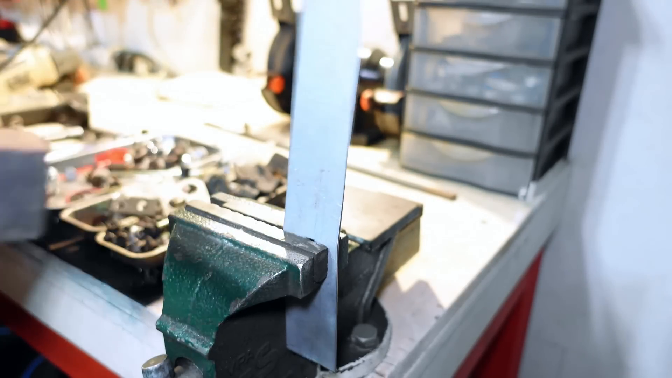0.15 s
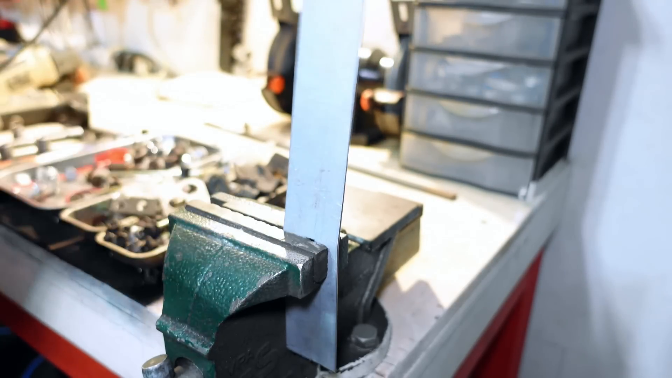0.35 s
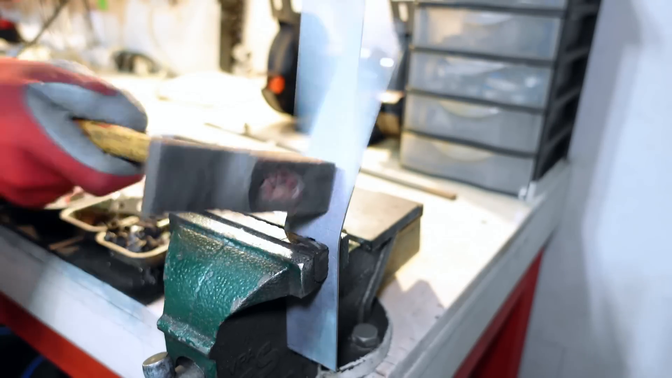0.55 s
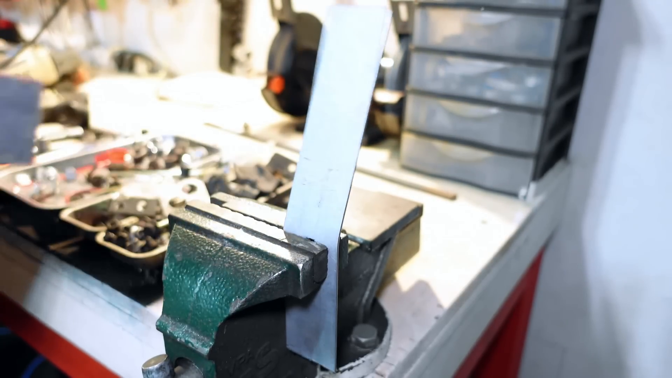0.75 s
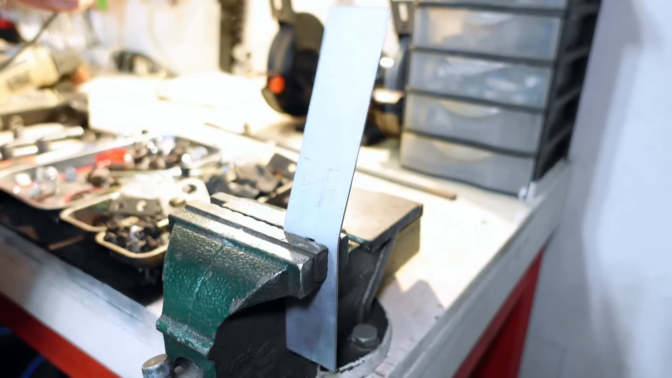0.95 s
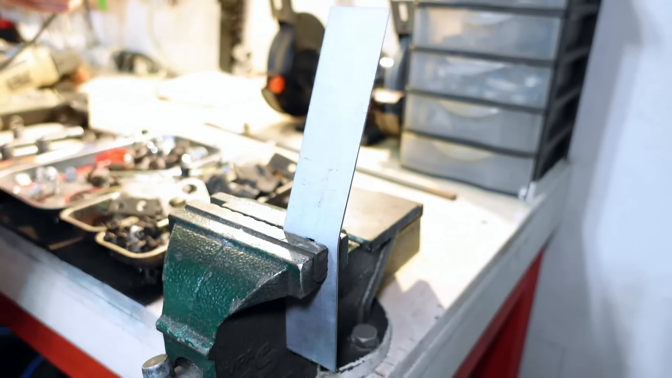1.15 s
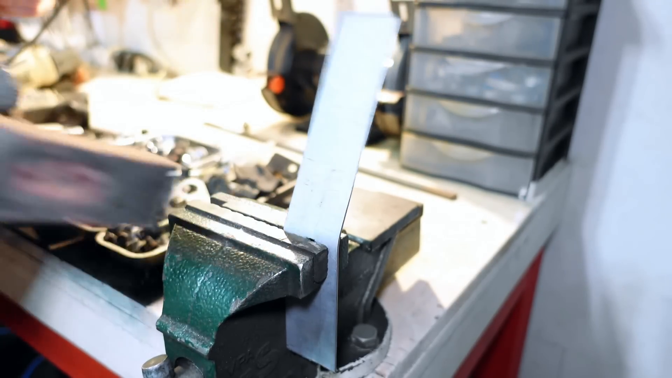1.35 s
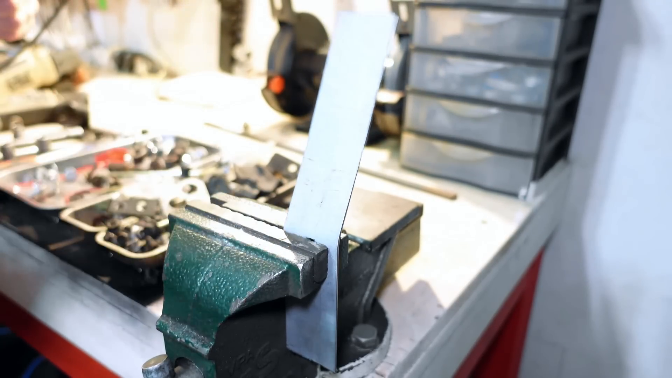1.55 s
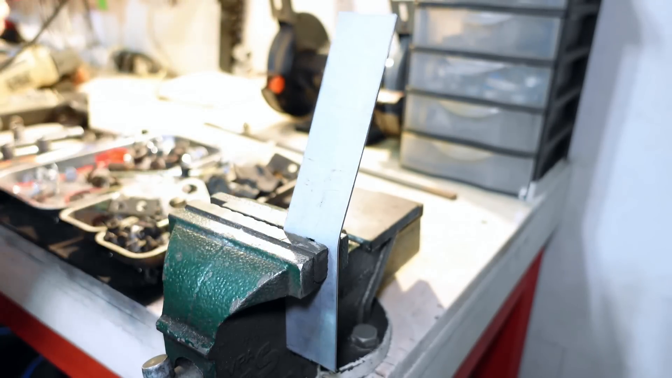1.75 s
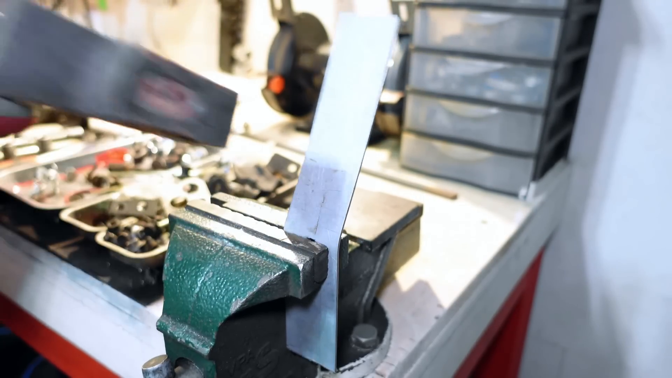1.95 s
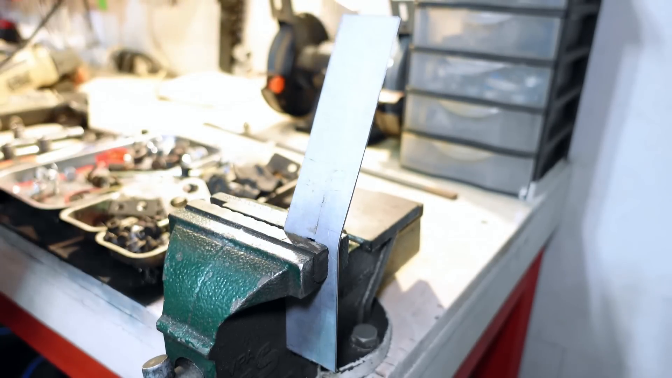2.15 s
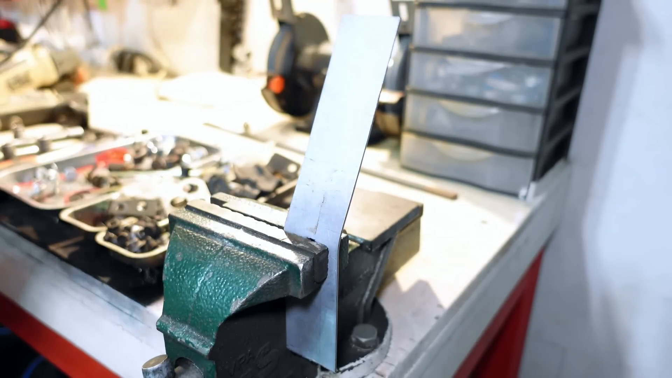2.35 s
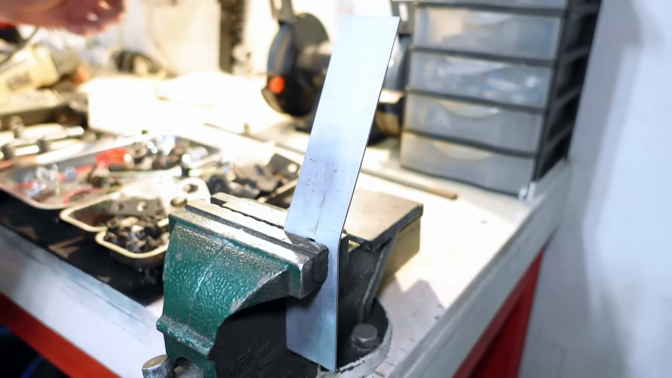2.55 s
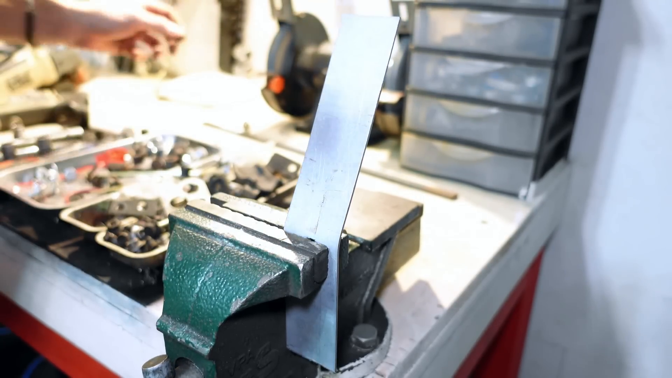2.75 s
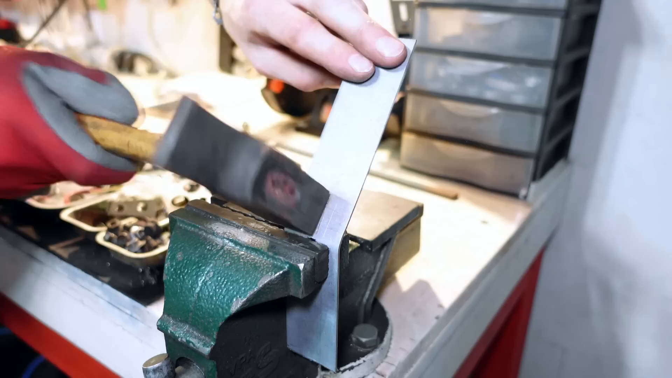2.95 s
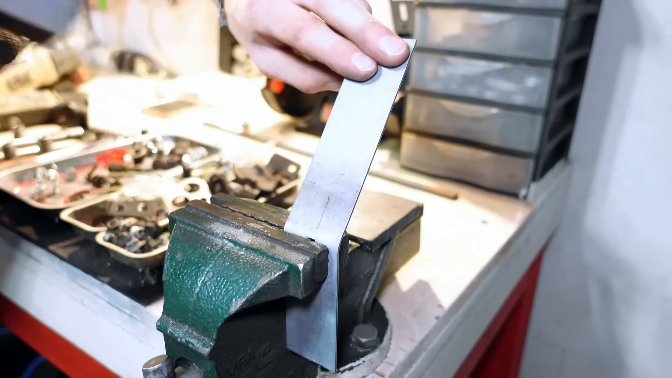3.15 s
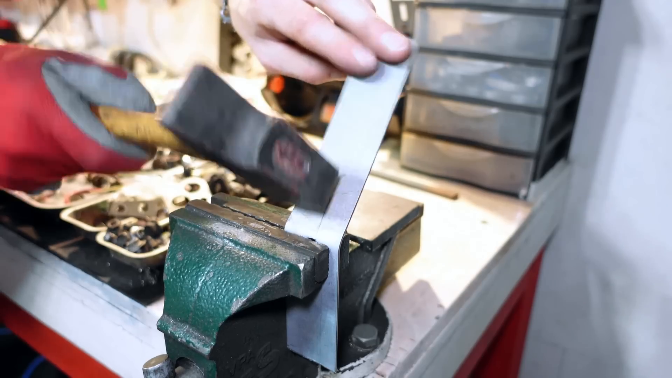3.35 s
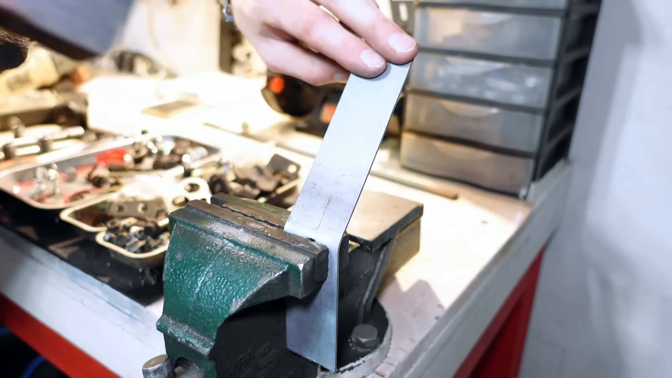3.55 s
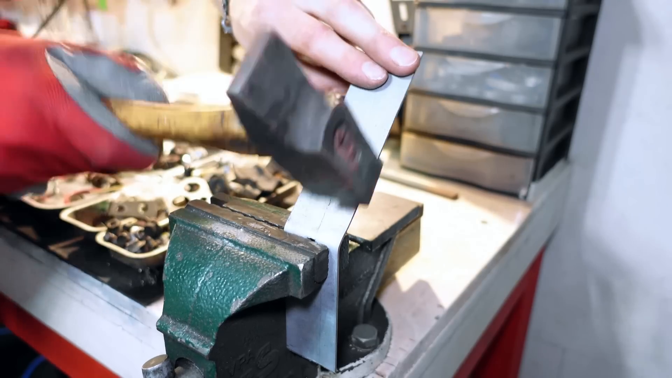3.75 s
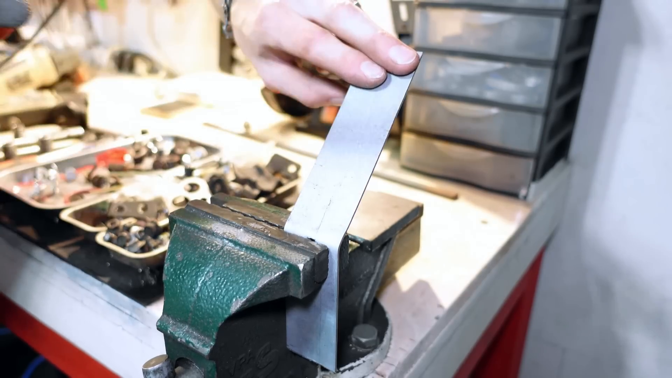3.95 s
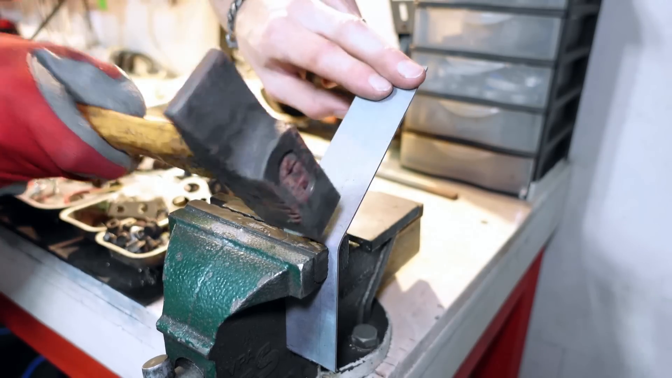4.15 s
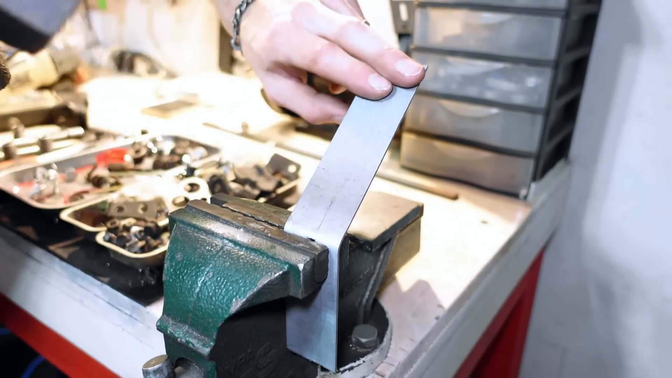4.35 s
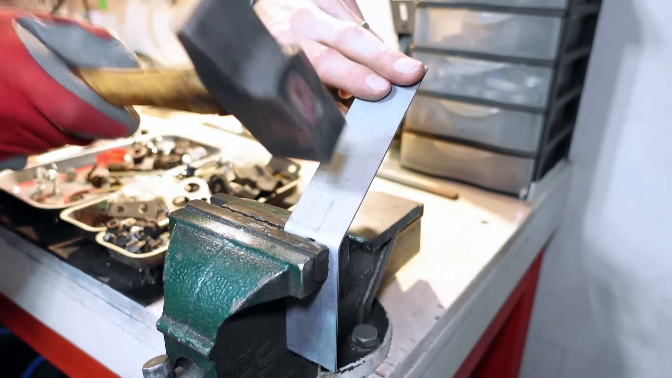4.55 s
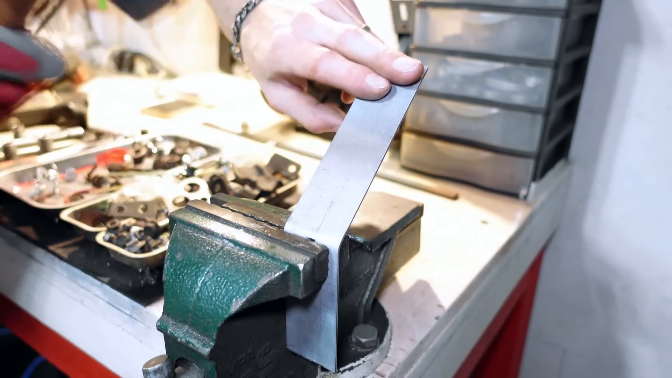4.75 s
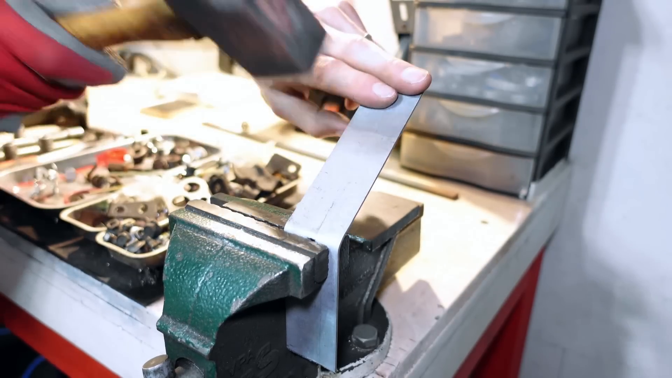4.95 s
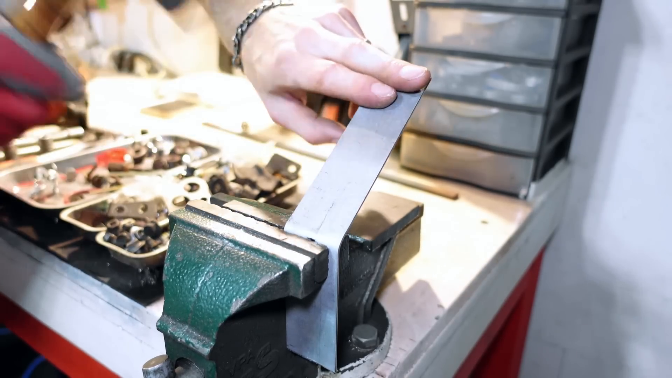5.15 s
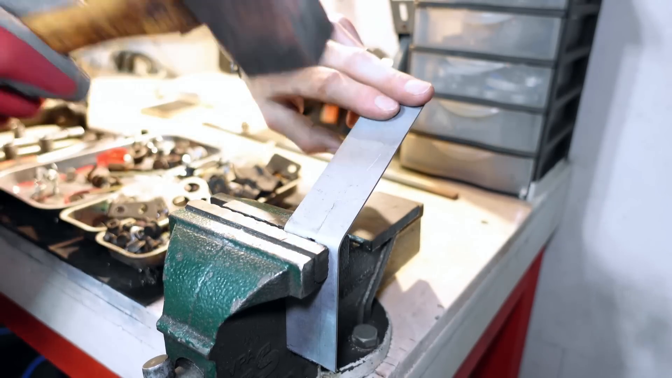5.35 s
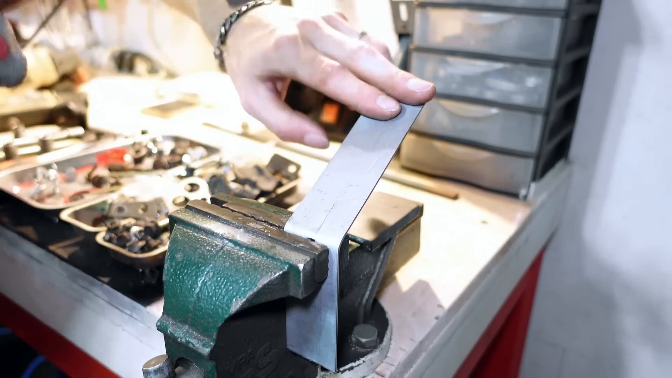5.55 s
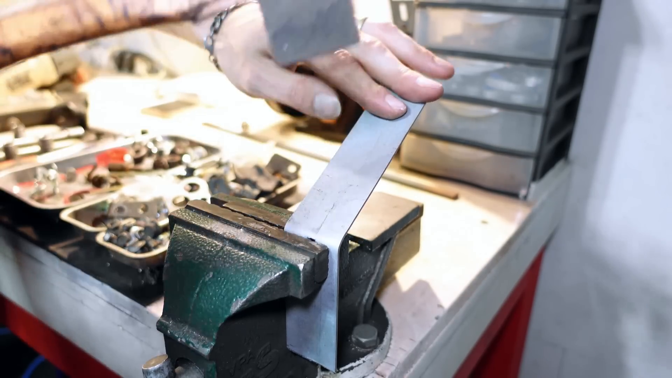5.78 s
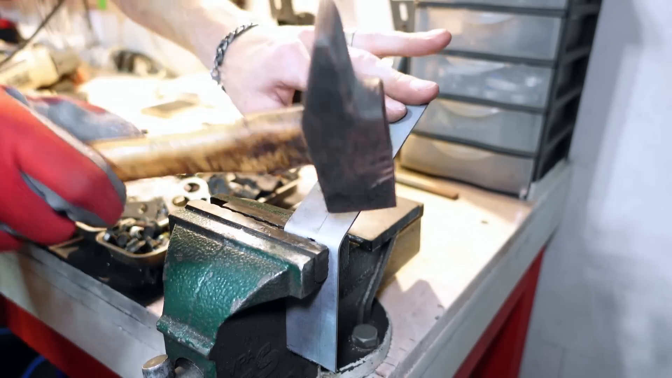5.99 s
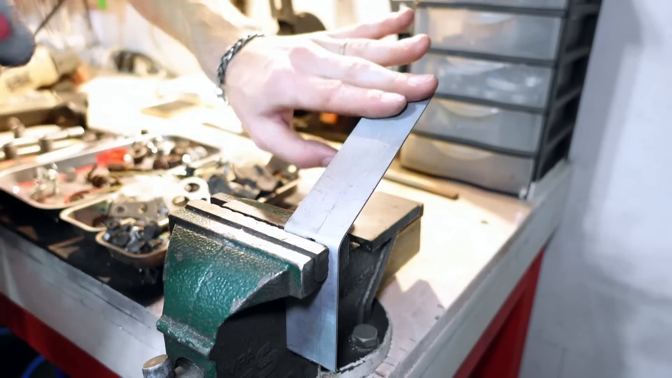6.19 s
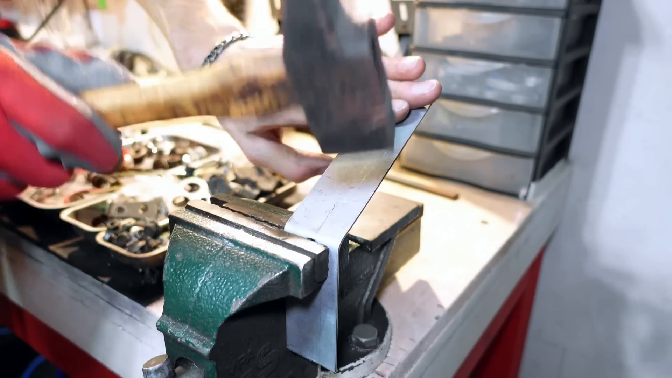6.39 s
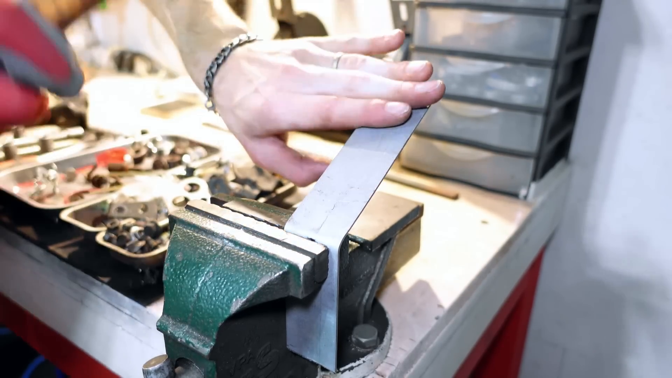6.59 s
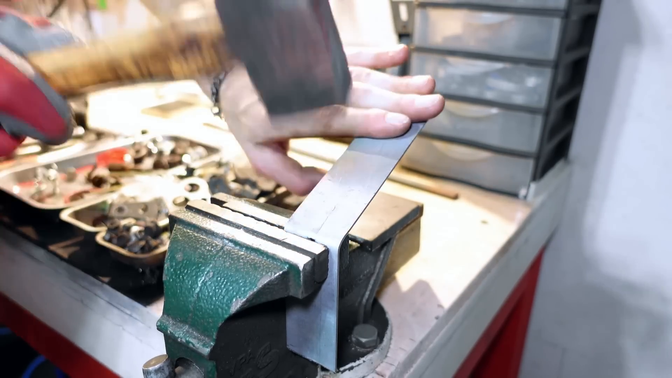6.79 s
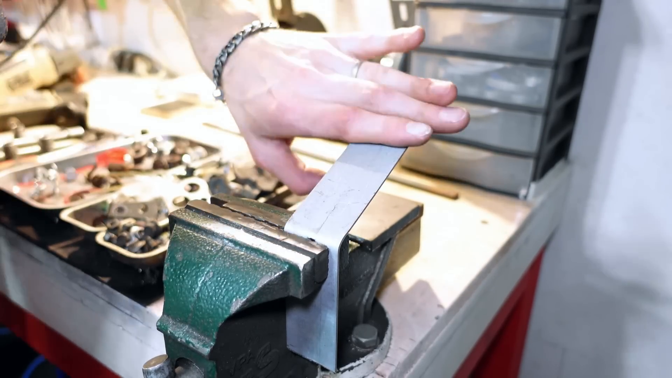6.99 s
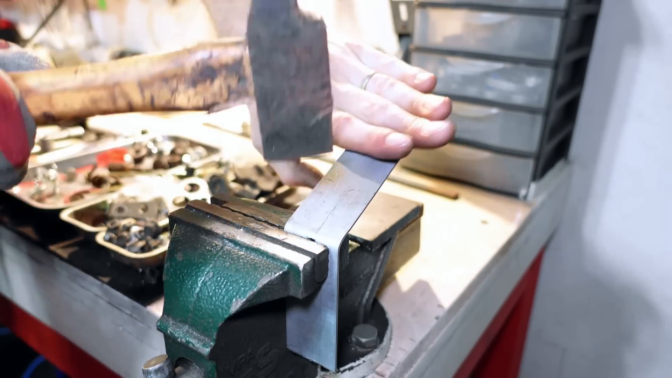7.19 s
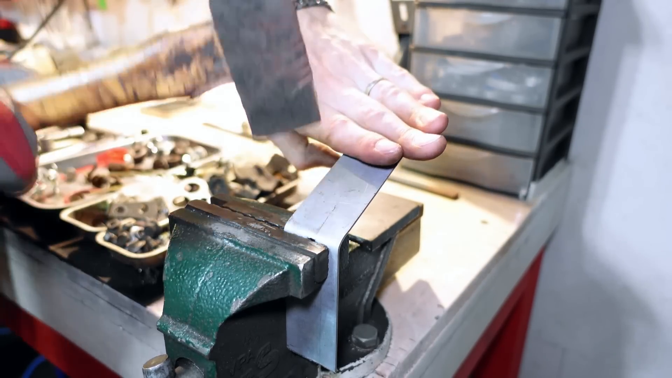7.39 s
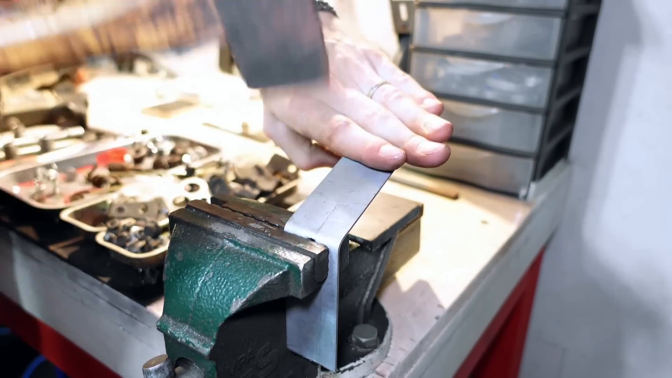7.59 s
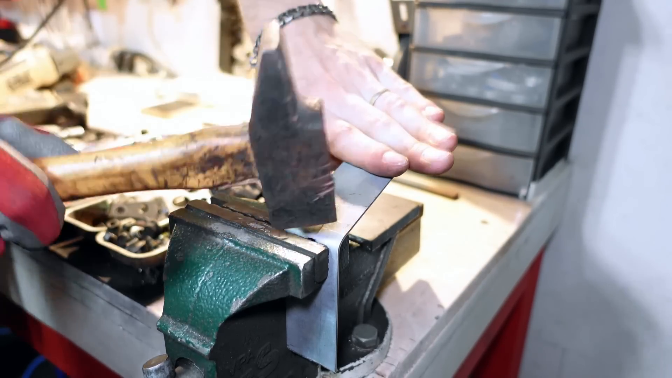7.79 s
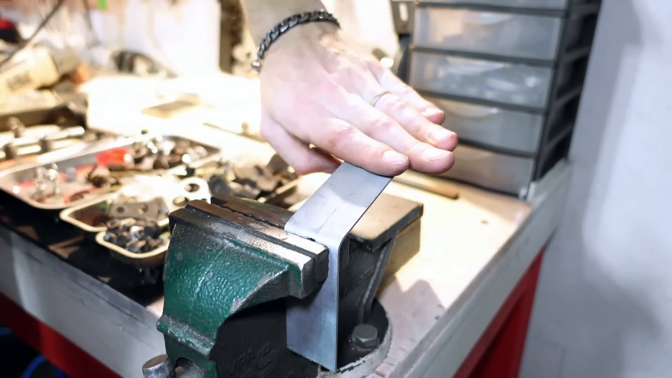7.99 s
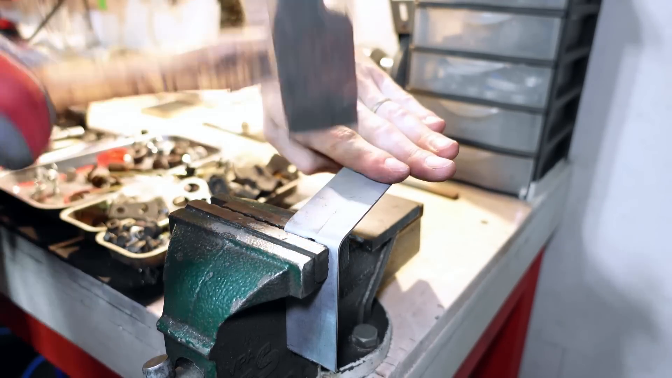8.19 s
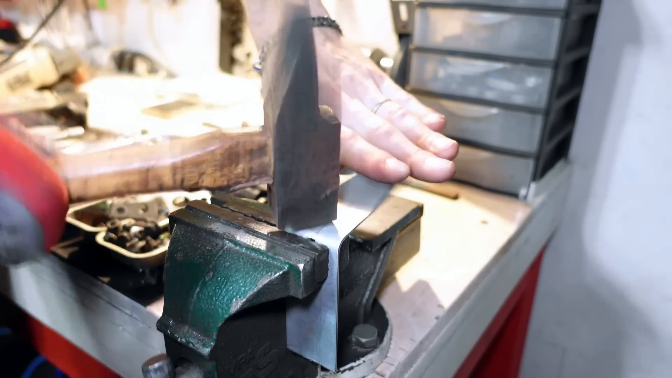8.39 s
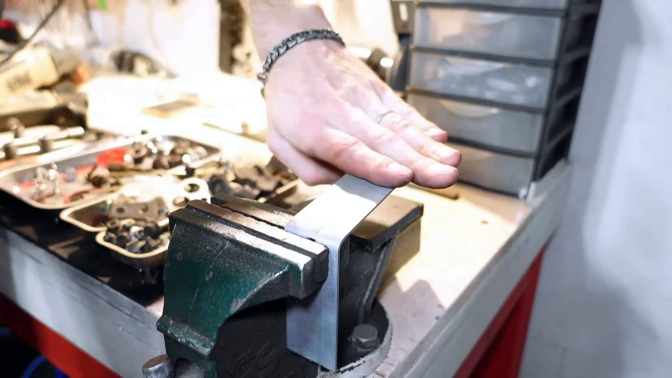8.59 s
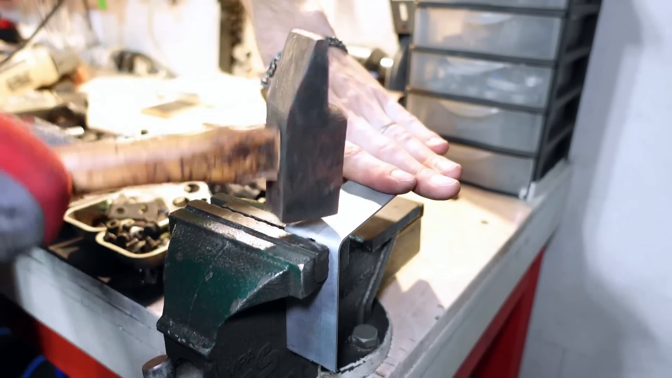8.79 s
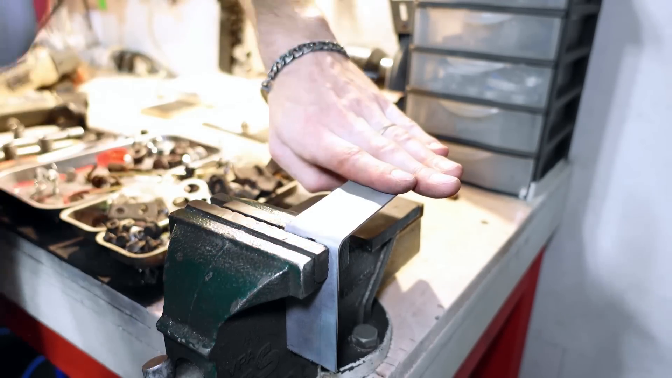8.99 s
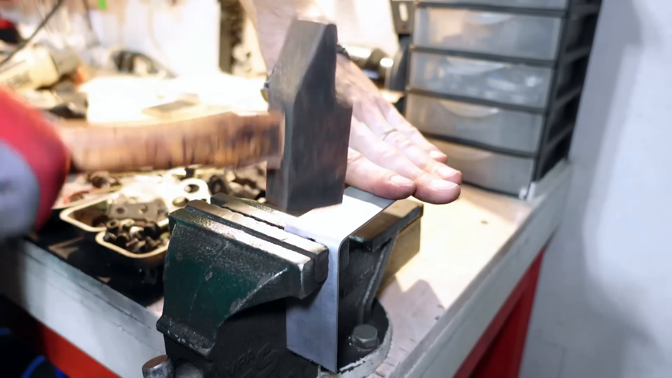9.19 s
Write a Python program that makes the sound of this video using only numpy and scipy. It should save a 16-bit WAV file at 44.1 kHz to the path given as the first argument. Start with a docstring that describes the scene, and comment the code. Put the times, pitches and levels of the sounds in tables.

```python
"""Hammering a steel bar in a vise

A hammer bends a flat bar clamped to a workshop bench. Each impact cracks, then swells into a clang of
bar, vise and loose tools over the boom of bench and room. The bar vibrates freely and buzzes in the
jaws until a hand holds it. The fourth blow shakes loose a steel part, which tumbles away."""
import numpy as np
from scipy import signal
from scipy.fft import rfft, irfft, next_fast_len
import sys
import numpy as np
from scipy import signal
from scipy.fft import rfft, irfft, next_fast_len
from scipy.io import wavfile

SR = 44100
rng = np.random.default_rng(int(sys.argv[2]) if len(sys.argv) > 2 else 0)


def dump_mix(stems):
    """Bounce the given channels to the path in sys.argv[1] as a 16-bit WAV at rate SR."""
    frames = np.atleast_2d(stems).T  # one column per channel
    limited = np.clip(frames, -1, 1)  # hard clip at full scale
    pcm = np.round(limited * 32767).astype(np.int16)
    wavfile.write(sys.argv[1], SR, pcm)


N = 407043
T = np.arange(int(1.12 * SR)) / SR  # seconds since a contact
HOLD_S = .087  # time before the clang starts to decay

# Hammer blows. Each row: start in seconds, crack, boom, clank and treble levels in dB,
# knock pitch in Hz, knock level in dB, zing pitch in Hz, zing level in dB.
BLOWS = [(0.0777, -16.5, 0, -1.5, 4, 485, -22, 7590, -25),
         (0.641, -11.5, -4, -5.5, 3, 980, -29, 4270, -22.5),
         (1.3448, -18, 1.5, 1.5, 4.5, 905, -27, 4560, -32),
         (1.9387, -.5, -4.5, 5, 2.5, 900, -24, 9100, -31),
         (3.0465, -10, 1, 6.5, -3.5, 1110, -25, 7320, -34.5),
         (3.4334, -12, 2.5, 3.5, -2, 1042, -24, 4500, -37), (3.8177, -10, 4, 0.5, -.5, 490, -25, 4440, -34),
         (4.1966, -11.5, .5, -.5, -.5, 1091, -28, 8100, -30),
         (4.568, -6.5, .5, 5, 0.5, 815, -26, 7400, -31.5), (4.92, -7, 2, -2, 0.5, 490, -28, 6600, -36),
         (5.299, -8, .5, -4, 1, 490, -28, 3660, -17.5), (6.051, -14.5, -6, -7, -3, 1010, -28, 4380, -22),
         (6.4031, -7.5, 1.5, -4.5, .5, 830, -33, 8480, -29), (6.7457, -8.5, -1, -7, 1, 480, -32, 4070, -17),
         (7.539, -13.5, -1.5, -5, -1, 840, -30, 9520, -35),
         (7.8646, -6, -.5, -2.5, 2, 850, -29, 11930, -36), (8.1776, -5, 0, -1, 1, 490, -30, 5660, -26.5),
         (8.4869, -7, -1, -2.5, 1.5, 490, -30, 8480, -28), (8.8086, -5, 1.5, 5, 2.5, 1020, -27, 1650, -32),
         (9.133, -6, -2.5, 4.5, 1, 660, -24, 5420, -29)]
# Decay of a clang in the workshop. Each row: frequency in Hz, time to fall 60 dB in seconds.
DECAY_TIMES = [(35, 0.41), (95, 0.98), (180, 0.77), (500, 0.59), (1500, 0.45), (4000, 0.49), (9000, 0.42),
               (15000, 0.24)]
# Likeness of the two channels. Each row: frequency in Hz, coherence from 0 to 1.
COHERENCE = [(150, 1), (600, 0.97), (2000, 0.94), (5000, .83), (14000, .87)]


def hammer():
    """Impact excitation: each blow cracks, then drives dense modes weighted by where it lands."""
    # Spectra of the clang and of the first crack. Each row: frequency in Hz, level in dB.
    clang_spectrum = [(25, -45), (55, -24.5), (110, -10), (170, -3), (280, -3.5), (450, -5), (700, -5.5),
                      (1000, -11.5), (1500, -14), (2600, -17.5), (4600, -12), (7000, -18.5), (10000, -19.5),
                      (15500, -27.5)]
    crack_spectrum = [(100, -32), (700, -10), (2000, -9), (4800, 2.5), (8000, -4.5), (15500, -5.5)]
    # Resonances of a jolted vise. Each row: centre in Hz, half-width in Hz, gain in dB per dB of jolt.
    jolt_resonances = [(680, 150, 1.9), (1420, 150, 2.2)]
    out = np.zeros((2, N))
    grid = np.fft.rfftfreq(len(T), 1 / SR)
    room_db = 3 * ripple(grid, spacing=11) / (1 + (grid / 1800) ** 2)  # same room modes for every blow
    for start, crack_db, boom_db, clank_db, treble_db, *_ in BLOWS:
        crack = noise(lambda hz: along(crack_spectrum, hz) + 3 * ripple(hz, spacing=400))
        crack *= fade(T, t60=.021)
        crack /= np.sqrt(np.mean(crack[:, T < .003] ** 2))  # rms 1 over the first 3 ms
        add(out, start, amp(crack_db) * crack)

        jolt = max(clank_db - 3, 0)  # a strong clank jolts the whole vise and dulls the sizzle
        colour = [(180, boom_db), (650, clank_db), (4600, treble_db), (10500, treble_db - .8 * jolt)]
        jolt_db = jolt * sum(gain * bump(grid, hz, width) for hz, width, gain in jolt_resonances)
        steel_db = 2.6 * ripple(grid, spacing=85) * grid / (grid + 600)  # other modes at each landing
        steel_db += 2.3 * ripple(grid, spacing=550) * grid / (grid + 2500)  # gathered in broad groups
        modes_db = jolt_db + steel_db + room_db
        clang = noise(lambda hz: along(clang_spectrum, hz) + along(colour, hz) + modes_db)
        rattle_s = .008 * max(crack_db + 6.5, 0)  # a hard blow keeps the clang going longer
        clang = die_away(clang, HOLD_S + rattle_s)
        # The clang starts low and rises like a limiter recovering, deeper and slower after a weak crack.
        weakness = max(-9.5 - crack_db, 0)
        recovery = swell(start_db=-6.5 - .72 * weakness, rise=.018 + .0021 * weakness)
        add(out, start, amp(-1) * (clang + vise(colour)) * recovery)
        add(out, start, amp(boom_db - 24.5) * boom(lag=.0264, hold=.11, t60=.52))
    return out


def vise(colour, detune=.006):
    """Damped modes of vise and hammer head, their pitches scattered as grip and contact change."""
    # Each row: frequency in Hz, level in dB, time to fall 60 dB in seconds.
    modes = [(337.8, -34, 0.6), (419, -41, 0.18), (488, -30, 0.55), (572, -39.5, 0.66), (658, -37.5, 0.37),
             (891, -36.5, 0.39), (1077, -37.5, 0.59), (1420, -42, .45), (1860, -43, 0.5), (2776, -39, 0.51),
             (4590, -35.5, 0.59), (5450, -31.5, 0.38), (9500, -42.5, .4), (10400, -39, 0.38)]
    ring = np.zeros((2, len(T)))
    for hz, db, t60 in modes:
        gain = amp(db + along(colour, hz) + rng.normal(0, 2.8))
        pitch = hz * (1 + detune * rng.normal())
        flutter = (.7 + hz / 10000) * ripple(T, spacing=.02)
        ring += gain * tone(pitch, flutter) * fade(T, t60, HOLD_S)
    return ring


def boom(lag, hold, t60):
    """Beating: neighbouring low modes of bench and room, alternating in sign, interfere in a throb."""
    # Each row: frequency in Hz, level in dB.
    modes = [(124, -9), (151, -9.5), (169, 4), (186, 1), (201, 5), (222, -8.5), (245, -9.5)]
    throb = sum((-1) ** k * amp(db + rng.normal(0, 1)) * np.sin(2 * np.pi * hz * (T - lag))
                for k, (hz, db) in enumerate(modes))
    return throb * swell(start_db=-27, rise=.018) * fade(T, t60, hold)


def knocks_and_zings():
    """Selective excitation: strike point and grip pick a low knock, a high zing and a stray cluster."""
    # Inharmonic partials of a bending bar. Each row: multiple of the knock pitch, level in dB.
    knock_partials = [(1, 0), (2.83, -8), (5.4, -12)]
    out = np.zeros((2, N))
    for start, *_, treble_db, knock_hz, knock_db, zing_hz, zing_db in BLOWS:
        for multiple, db in knock_partials:
            add(out, start, amp(knock_db + db) * cluster(multiple * knock_hz))
        add(out, start, amp(zing_db) * cluster(zing_hz))
        stray_hz = rng.uniform(6020, 13000)
        add(out, start, amp(treble_db - 38) * cluster(stray_hz))
    return out


def cluster(centre):
    """Modal overlap: close steel modes beat round one pitch, and blur into noise if widely spread."""
    width = 32 + centre * (.012 + .16 * bump(centre, 3960, 520))  # Hz; the modes crowd near 4 kHz
    offsets = np.linspace(-.8, .8, num=4) + rng.uniform(-.2, .2, size=4)
    partials = unit(sum(bump(offset, 0, .95) * tone(centre + offset * width, .3 * ripple(T, spacing=.012))
                        for offset in offsets))
    haze = unit(noise(lambda hz: -20 * np.log10(1 + ((hz - centre) / width) ** 6)))
    blur = min(width / 450, 1)
    ring = np.sqrt(1 - blur) * partials + np.sqrt(blur) * haze
    t60 = along(DECAY_TIMES, centre) * (1 + 5 / width)  # narrow clusters outlast the clang
    return ring * swell(start_db=-5.5, rise=.02) * fade(T, t60, HOLD_S)


def free_bar(swing_hz=73.8, damping_hz=10000):
    """Free vibration: the unheld bar swings against the jaws, fluttering and chattering once a swing."""
    # Each row: frequency in Hz, level in dB, flutter depth in radians, 0 for bending or 1 for twisting.
    modes = [(77.7, -2, .05, 0), (225.4, -2, 0.63, 0), (287, -7, .2, 0), (443, -9, .3, 0), (842, -2, .3, 1),
             (901, 0, .4, 1), (1063, -2, .5, 1), (1260, -3.5, .9, 0), (1745, -6, .5, 0),
             (2640, -3.5, .6, 0), (2800, -6, 1.1, 1), (4510, -2, 1.1, 1), (6720, -13, .69, 0),
             (7640, -18, .13, 0), (8812, -19, .54, 1)]
    # Spells of ringing, each stopped by the next blow. Each row: start in seconds,
    # time for the buzz to fall 60 dB in seconds, bending, twisting and buzz levels in dB.
    spells = [(0, 2.6, -54, -80, -83), (.078, 2.3, -35, -62, -43), (.641, .8, -23.5, -20.5, -31),
              (1.345, 3.8, -41, -28, -32.5), (1.939, 1.7, -38, -55, -67)]
    # Chatter in the jaws. Each row: frequency in Hz, level in dB.
    buzz_spectrum = [(300, -2), (1500, 2.5), (3300, 0), (5000, -2.5), (6400, 5.5), (8000, -13.5),
                     (10000, -6), (12000, -9), (13200, -6), (15500, -5.5)]
    out = np.zeros((2, N))
    swing = 2 * np.pi * swing_hz * T
    for start, t60, bend_db, twist_db, buzz_db in spells:
        ring = np.zeros((2, len(T)))
        for hz, db, depth, twists in modes:
            gain = amp(db + (twist_db if twists else bend_db) + 3.5 * ripple(T, spacing=.06))
            flutter = depth * (np.sin(swing + rng.uniform(0, 2 * np.pi)) + .7 * ripple(T, spacing=.02))
            ring += gain * tone(hz, flutter) * fade(T, t60 / (1 + hz / damping_hz))
        chatter = noise(lambda hz: along(buzz_spectrum, hz) + 4.5 * ripple(hz, spacing=47))
        buzz = amp(buzz_db) * unit(chatter * amp(5.5 * np.cos(swing))) * fade(T, t60)
        next_blow = min(blow[0] for blow in BLOWS if blow[0] > start + .02)
        stopped = fade(T, t60=.08, hold=next_blow - start)
        add(out, start, (ring + buzz) * stopped * swell(start_db=-20, rise=.07))
    return out


def tumbling_part(lands_s=2.43, ring_db_per_s=27, thud_fall_db_per_s=140):
    """Repeated impacts: a loose steel part bounces and lands with a thud; each clack reverberates."""
    # Each row: start in seconds, level in dB.
    bounces = [(2.132, -8), (2.178, -7.5), (2.19, -6.5), (2.2245, -10), (2.238, -9), (2.294, -12.5),
               (2.308, -10.5), (2.329, -14), (2.344, -7), (2.352, -9), (2.436, -5), (2.474, -15),
               (2.526, -5.5), (2.573, -24)]
    # Each row: centre in Hz, half-width in Hz, gain in dB.
    resonances = [(1620, 300, 7.5), (1990, 25, 1), (2777, 90, 2), (5220, 150, 2)]
    # The broad clack under the resonances. Each row: frequency in Hz, level in dB.
    clack_spectrum = [(60, -25), (250, -1.5), (500, 0), (1300, 2), (3500, 0.5), (7000, -8.5), (15500, -21)]
    out = np.zeros((2, N))
    for start, db in bounces:
        ring_db = -4 + ring_db_per_s * (start - bounces[0][0])  # rings more as it clears the vise
        thud_db = 17.5 - thud_fall_db_per_s * (start - lands_s) if start > lands_s else -3

        def colour(hz):
            peaks_db = sum((gain + ring_db) * bump(hz, mode, width) for mode, width, gain in resonances)
            return along(clack_spectrum, hz) + peaks_db

        clack = unit(noise(lambda hz: colour(hz) + 2 * ripple(hz, spacing=250)))
        room = unit(noise(lambda hz: colour(hz) + thud_db * bump(hz, 570, 570)))
        attack = 1 - np.exp(-T / .0011)
        add(out, start, amp(db) * clack * attack * fade(T, t60=.045))
        add(out, start, amp(db - 15) * die_away(room, hold=.01))
    return out


def handling():
    """Light impacts give faint knocks; friction gives a swish as the hand shifts along the bar."""
    # Each row: start in seconds, level in dB, resonance in Hz.
    taps = [(.043, -45.5, 9000), (1.135, -54, 1190), (5.79, -52.5, 679), (7.503, -61, 7400)]
    out = np.zeros((2, N))
    for start, db, centre in taps:
        tap = unit(noise(lambda hz: 26 * bump(hz, centre, .25 * centre) - 6 * np.log2(1 + hz / centre)))
        add(out, start, amp(db) * tap * (fade(T, t60=.073) + amp(-15) * fade(T, t60=.4)))
    swish = unit(noise(lambda hz: along([(300, -19.5), (4500, 0), (15000, 1)], hz)))
    add(out, 7.24, amp(-53.5) * swish * bump(T, .048, .027))
    return out


def room_tone():
    """Ambient noise: a steady broadband floor, strongest in the bass."""
    # Each row: frequency in Hz, level in dB.
    spectrum = [(25, -15), (80, -7), (200, -9.5), (600, -11), (2000, -16.5), (6000, -21.5), (15500, -30)]
    return amp(-64.5) * unit(noise(lambda hz: along(spectrum, hz), size=N))


def noise(colour, size=len(T)):
    """Partly coherent stereo noise, shaped by colour(Hz) in dB and nearly mono in the bass."""
    hz = np.fft.rfftfreq(size, 1 / SR)
    angle = np.arccos(along(COHERENCE, hz)) / 2
    spectrum = rfft(rng.standard_normal((2, size))) * amp(colour(hz))
    mid, side = irfft(spectrum * [np.cos(angle), np.sin(angle)], size)
    return np.array([mid + side, mid - side])


def tone(hz, flutter):
    """A phase-modulated partial of rms 1; lower coherence spreads the channels' phases further."""
    spread = np.arccos(along(COHERENCE, hz)) / np.sqrt(2)
    phase = rng.uniform(0, 2 * np.pi) + spread * rng.standard_normal((2, 1))
    return np.sqrt(2) * np.sin(2 * np.pi * hz * T + phase + flutter)


def die_away(x, hold):
    """Frequency-dependent damping: after hold seconds each band fades at the workshop's rate."""
    hz, t, bands = signal.stft(x, SR, nperseg=256)
    bands *= fade(t, along(DECAY_TIMES, hz)[:, None], hold)
    return signal.istft(bands, SR, nperseg=256)[1][:, :len(T)]


def swell(start_db, rise):
    """Attack envelope: the level starts at start_db and rises to full over about rise seconds."""
    return amp(start_db * np.exp(-(T / rise) ** 2))


def fade(t, t60, hold=0):
    """Exponential decay of 60 dB every t60 seconds, beginning after hold seconds."""
    return np.exp(-np.log(1000) * np.maximum(t - hold, 0) / t60)


def ripple(axis, spacing):
    """Random ups and downs along time or frequency, interpolated between knots spacing apart."""
    knots = rng.standard_normal(4096)
    return 1.2 * np.interp(axis / spacing, np.arange(len(knots)), knots)


def bump(x, centre, width):
    """A Gaussian bell of height 1."""
    return np.exp(-((x - centre) / width) ** 2)


def along(points, hz):
    """Interpolation of (Hz, value) points on a logarithmic frequency axis."""
    frequencies, values = np.transpose(points)
    return np.interp(np.log(hz + 1), np.log(frequencies + 1), values)


def amp(db):
    """Decibels to amplitude ratio."""
    return 10 ** (np.asarray(db) / 20)


def unit(x):
    """Normalisation to rms 1."""
    return x / np.sqrt(np.mean(x ** 2) + 1e-20)


def add(out, start, x):
    """Superposition of x on out, from start seconds."""
    i = round(start * SR)
    out[:, i:i + x.shape[-1]] += x[..., :N - i]


def scene():
    """Superposition of hammering, ringing and clatter on a quiet room."""
    air = room_tone()
    return hammer() + knocks_and_zings() + free_bar() + tumbling_part() + handling() + air


def record(dry):
    """Soft saturation rounds the highest peaks; a low-pass filter then limits the bandwidth."""
    ceiling, top_hz = .9, 15900
    rounded = dry / (1 + np.abs(dry / ceiling) ** 6) ** (1 / 6)
    size = next_fast_len(N + SR // 2)
    passband = np.clip((top_hz - np.fft.rfftfreq(size, 1 / SR)) / 200, 0, 1)
    return irfft(rfft(rounded, size) * passband, size)[:, :N]


dry = scene()
out = record(dry)
dump_mix(out)
```